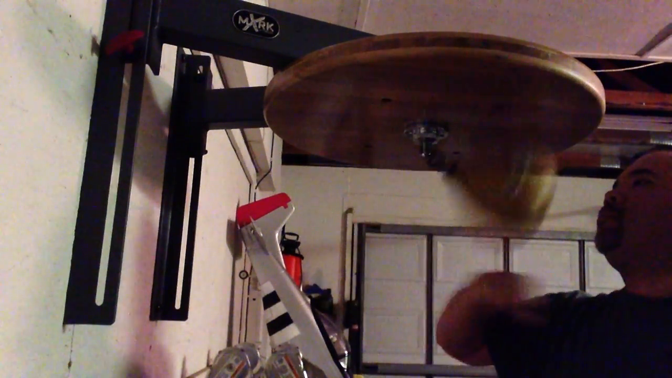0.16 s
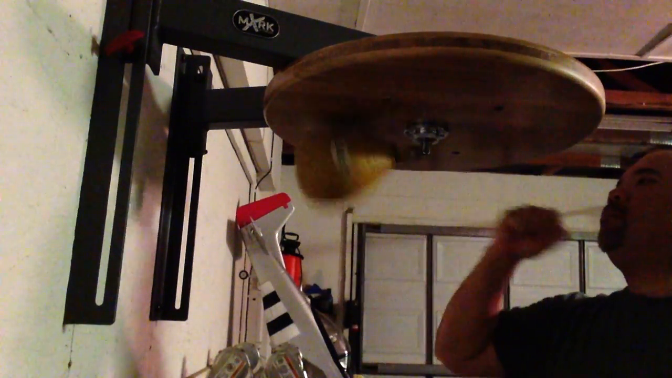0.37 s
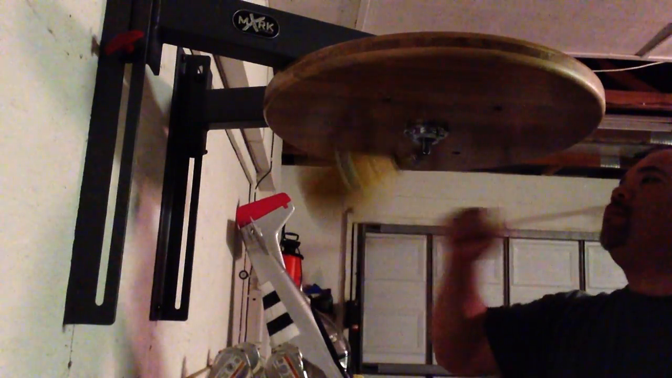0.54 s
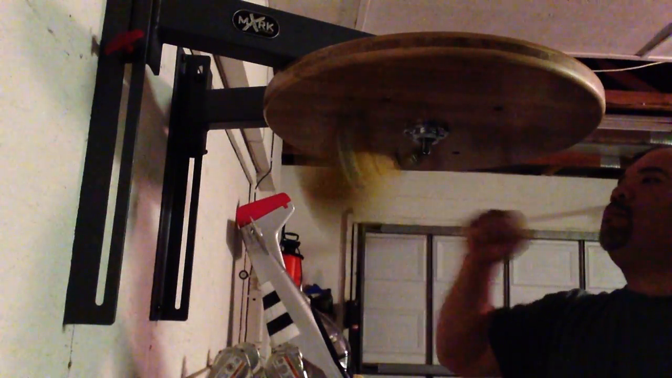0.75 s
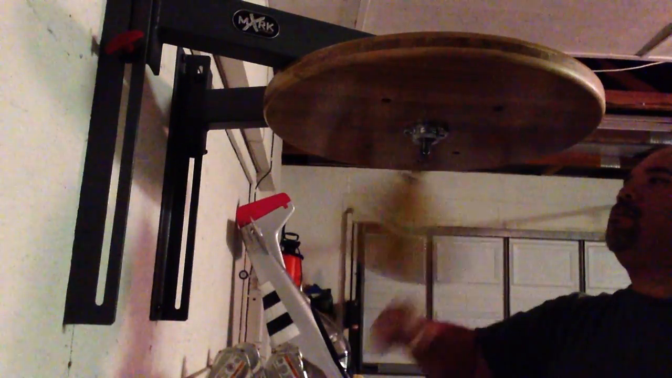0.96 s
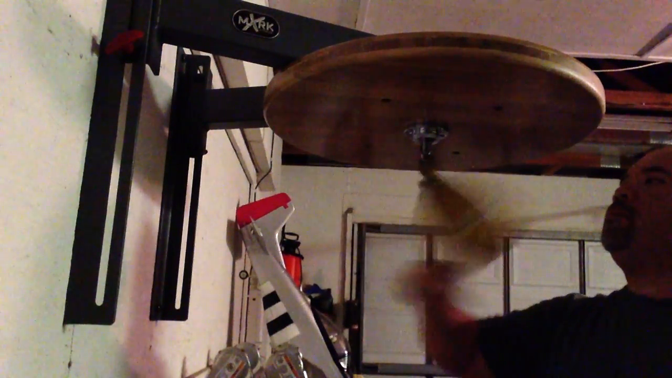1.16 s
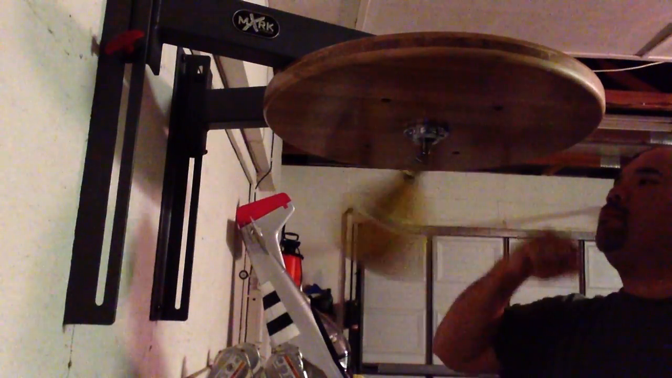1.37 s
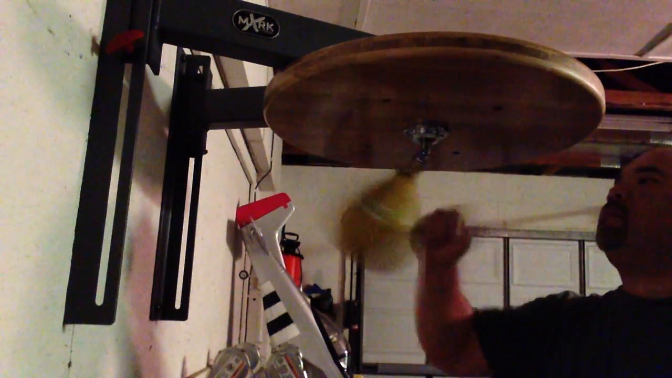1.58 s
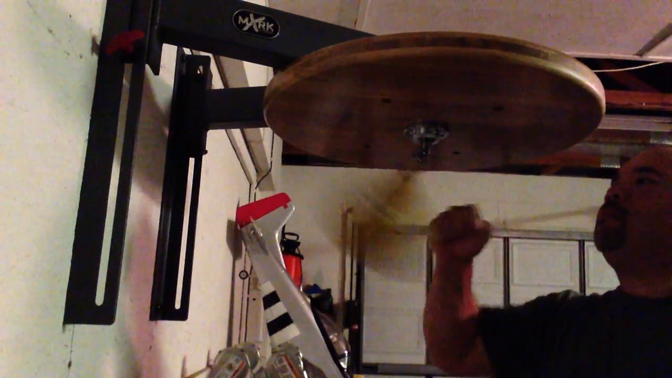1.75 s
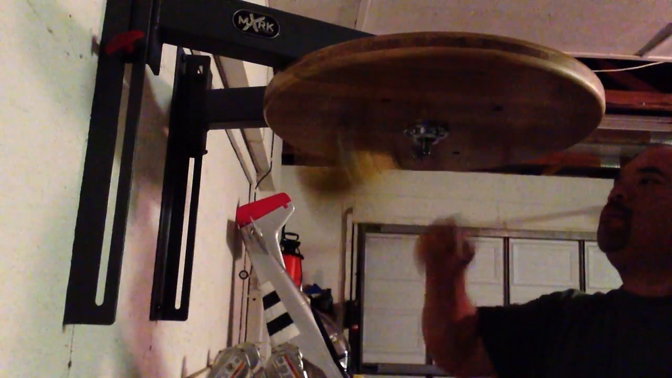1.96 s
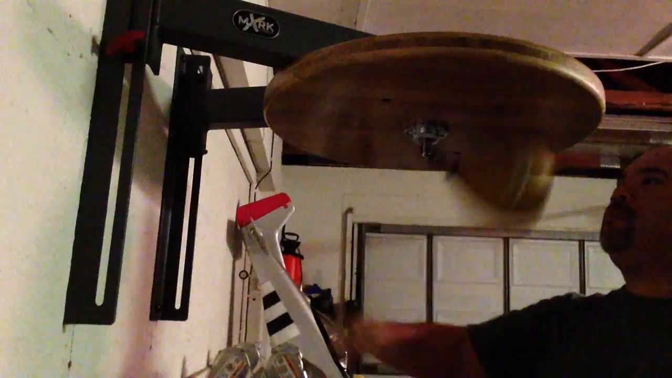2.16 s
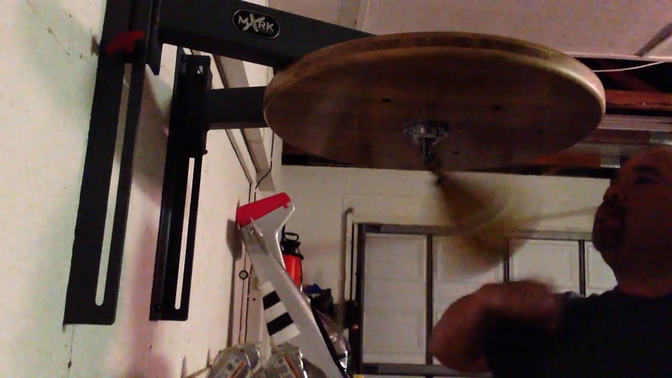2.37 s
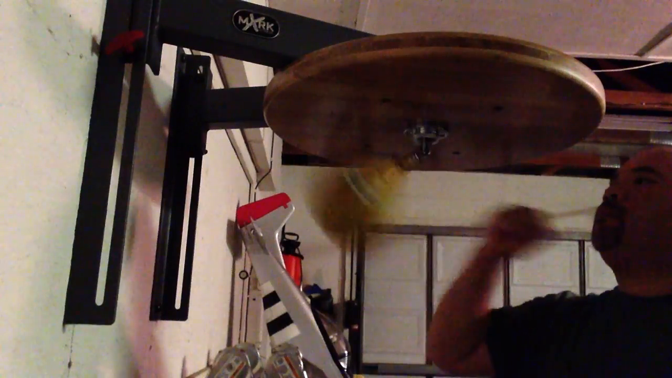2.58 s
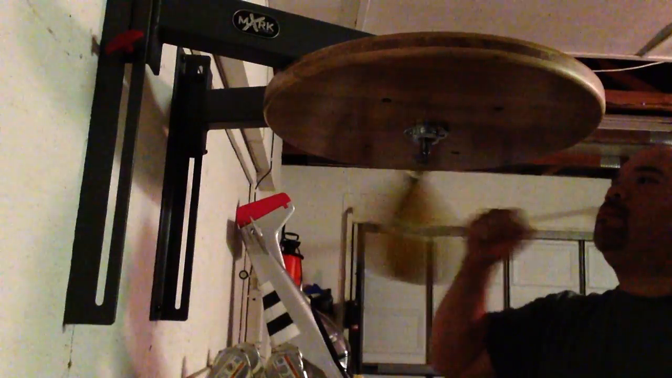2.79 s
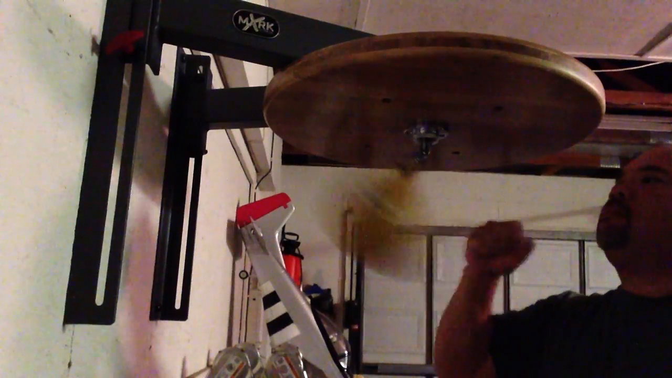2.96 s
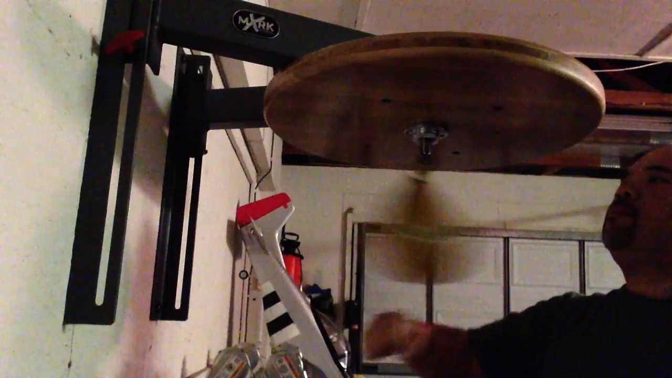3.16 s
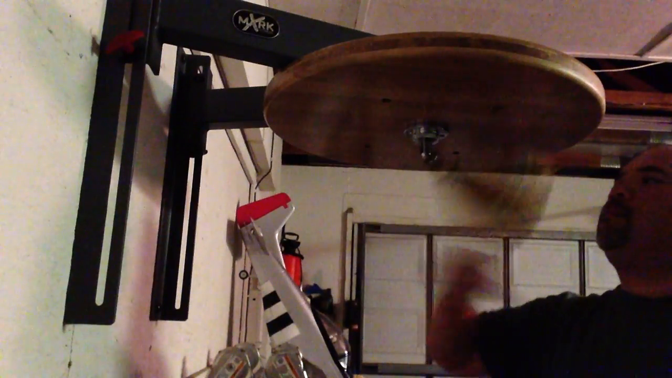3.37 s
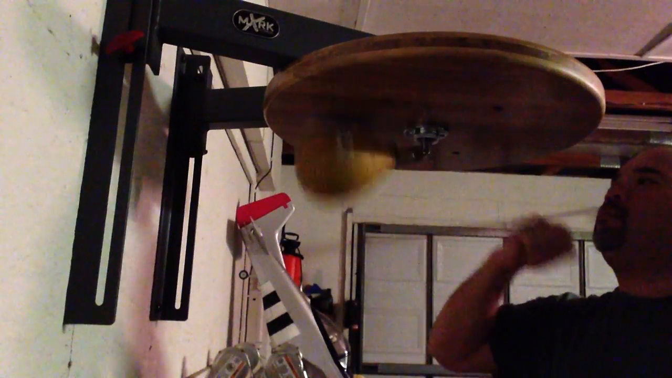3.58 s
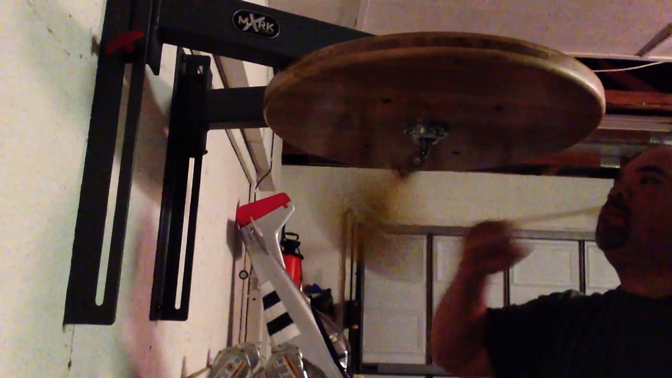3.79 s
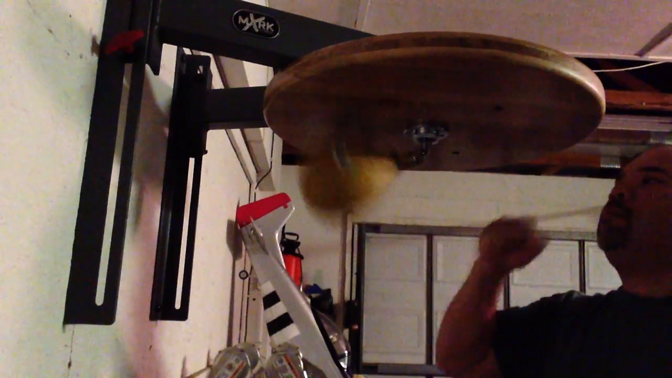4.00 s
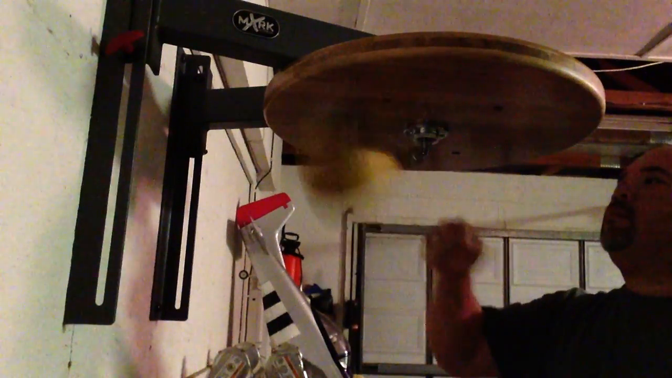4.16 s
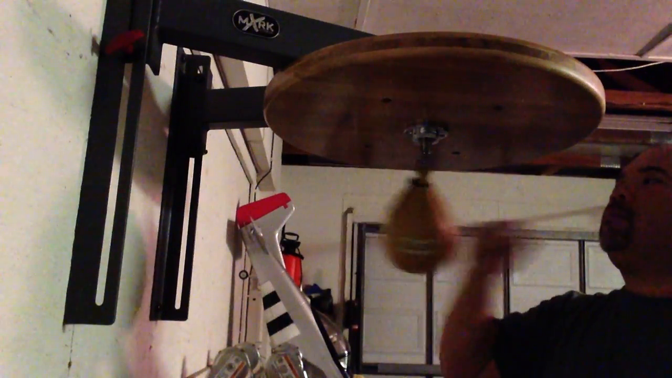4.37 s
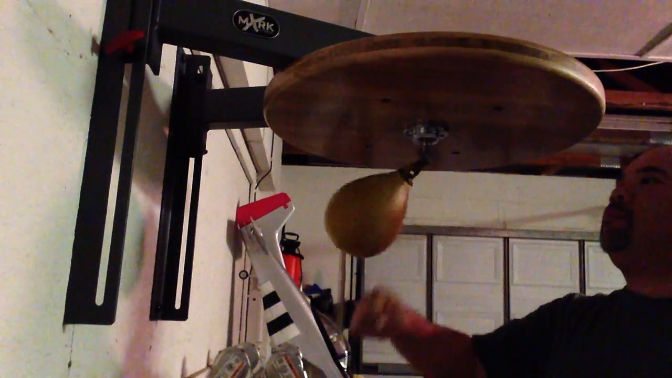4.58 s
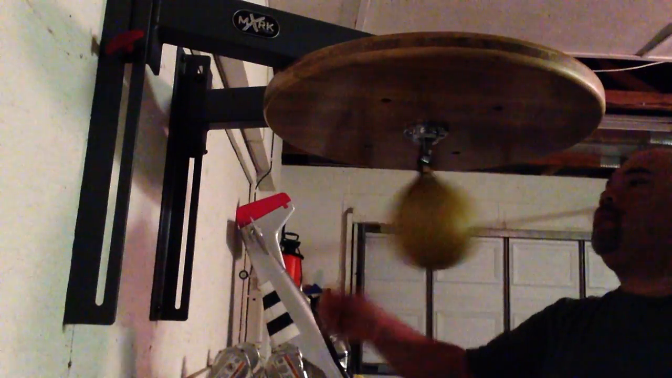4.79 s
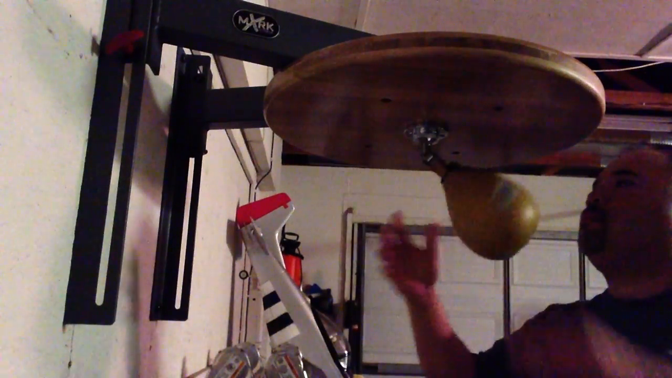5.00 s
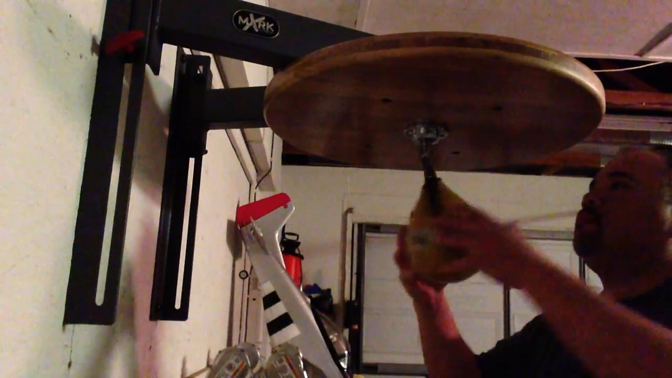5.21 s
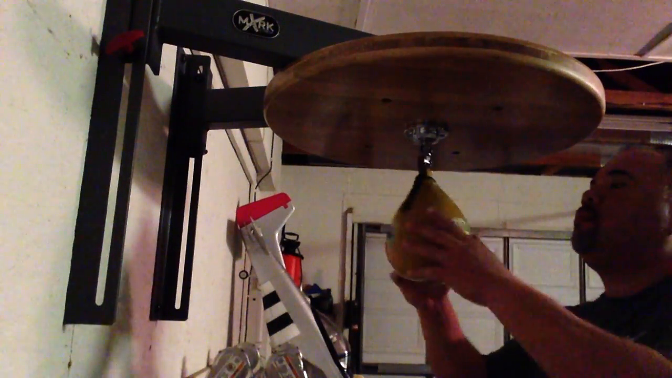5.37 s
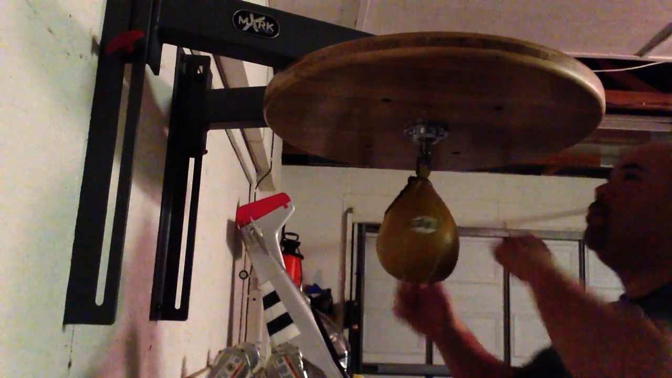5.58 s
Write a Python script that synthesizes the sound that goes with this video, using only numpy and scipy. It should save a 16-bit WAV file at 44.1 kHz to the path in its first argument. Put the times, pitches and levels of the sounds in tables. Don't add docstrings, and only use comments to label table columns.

```python
import sys
import numpy as np
from scipy import signal
from scipy.fft import rfft, irfft
from scipy.io import wavfile
from scipy.ndimage import uniform_filter1d

SR = 44100
rng = np.random.default_rng(int(sys.argv[2]) if len(sys.argv) > 2 else 0)


def linear_from_db(decibels):
    return 10 ** (np.asarray(decibels, float) / 20)


def generate_wav(sig):
    pcm = np.round(np.clip(np.atleast_2d(sig).T, -1, 1) * 32767).astype(np.int16)
    wavfile.write(sys.argv[1], SR, pcm)


N = 248724

# frequency in Hz, density in dB per Hz.
FLOOR_COLOUR = [(30, -34), (55, -19), (75, -9), (110, -13.5), (250, -8.5), (450, -10.5), (1000, -15.5),
                (2000, -24.5), (4500, -23), (8000, -29), (15000, -23.5)]
# frequency in Hz, level in dB.
APPLIANCE_TONES = [(72, -80), (87, -79)]
# frequency in Hz, t60 in seconds.
GARAGE_DECAY = [(100, 1), (500, 0.49), (1500, 0.49), (3000, 0.44), (6000, 0.31), (10000, 0.27),
                (15000, 0.058)]
# frequency in Hz, level in dB.
TAIL_COLOUR = [(150, -8), (400, -0.5), (1500, -3), (3000, -5.5), (6000, -6), (10000, -3), (15000, -4)]
# delay in seconds, level in dB.
ECHOES = [(.0035, -38), (.0075, -24.5), (0.015, -19.5), (.046, -16)]
# frequency in Hz, level in dB.
ECHO_COLOUR = [(300, -8), (1800, 0), (5000, -8), (9000, -22), (15000, -30)]
# time in seconds, level in dB.
RUB_LEVEL = [
    (5.148, -86),
    (5.3, -71),
    (5.339, -62.5),
    (5.38, -75),
    (5.41, -65),
    (5.458, -70.5),
    (5.49, -71),
    (5.64, -76),
]
# frequency in Hz, level in dB.
STEEL_COLOUR = [(2500, -22), (4000, -12.5), (5100, -5), (6300, -7.5), (8500, -11), (10500, -8.5),
                (12000, -6), (13300, -7.5), (14900, 0), (15500, -6), (16200, -31.5)]
# start in seconds, level in dB, lower treble in dB.
RATTLES = [(.1262, -25, -4.5), (.2, -7, -5.5), (.3077, -30, 3), (.5392, -26, -28), (.588, -19.5, 0),
           (.614, -26, -18.5), (1.2437, -19.5, -0.5), (1.3059, -10.5, -14), (1.3843, -18, -11.5),
           (1.6926, -23, -11.5), (1.8267, -20, -7), (1.9954, -20, 6.5), (2.3404, -9.5, -9),
           (2.356, -26, -1), (2.389, -7.5, -10.5), (2.4174, -15, -21), (2.4695, -14, -15.5),
           (2.7567, -24, -13), (2.908, -13, -9.5), (3.4795, -11.5, 4.5), (3.9115, -25, 1),
           (3.932, -20.5, -9.5), (4.204, -19, -3), (4.3874, -25.5, 2), (4.4014, -15.5, -25),
           (4.457, -15, -4.5), (4.5236, -26.5, -16), (4.859, -35, 0), (5.0375, -27, -10.5),
           (5.1751, -48, -30)]
# frequency in Hz, level in dB.
LEATHER_COLOUR = [(60, -48.5), (150, -27), (500, -22.5), (1000, -10), (1700, -6.5), (2600, -9), (4000, -14),
                  (6500, -17.5), (9000, -25.5), (15200, -38.5), (16000, -54)]
# frequency in Hz, level in dB, t60 in seconds.
BRACKET_MODES = [(443, 0, .3), (457, -6, .2), (330, -4, .2), (240, -5, .2), (105, -5, .2), (872, -9, .2),
                 (990, -8, .25)]
# start in seconds, level in dB, hollow note in Hz,
# bracket hum in dB, brightness in dB.
PUNCHES = [(.154, -9.5, 2420, -31.5, 8), (0.1724, -12.5, 1570, -34.5, 0), (0.1872, -12, 2230, -42, 2),
           (.255, -23, 1770, -44, 4.5), (1.2472, -9, 1420, -35, 4), (1.292, -29, 1670, -29, -7.5),
           (1.3062, -9, 1620, -55, 3.5), (1.996, -27.5, 2280, -61.5, -4), (2.035, -26, 2220, -39.5, -2.5),
           (2.3427, -10, 1780, -33.5, 6.5), (2.3609, -20.5, 1770, -42, -2), (2.376, -21.5, 1772, -38, -5),
           (2.3986, -7, 2498, -29.5, -3), (3.458, -17.5, 1680, -41, 5.5), (3.494, -23.5, 2260, -70.5, -3),
           (3.801, -21.5, 1740, -52, 6), (4.4059, -16.5, 1640, -40, 9), (4.459, -29.5, 1600, -42, -15),
           (4.698, -54.5, 2200, -66, -5), (4.859, -40.5, 2020, -57, -22)]
# start in seconds, level in dB, bracket hum in dB.
TAPS = [(0.421, -46, -39), (0.509, -30, -55), (0.6242, -31.5, -44.5), (0.6845, -24, -33.5),
        (0.7872, -24.5, -47), (.9455, -25.5, -56), (1.1, -26, -55.5), (1.117, -28.5, -46.5),
        (1.7056, -24, -47), (1.869, -29, -60), (2.076, -25.5, -62), (2.1787, -27.5, -60.5),
        (2.202, -28.5, -49.5), (2.267, -28, -42.5), (2.585, -35, -44.5), (2.6484, -32, -40.5),
        (2.767, -27.5, -49.5), (2.906, -25, -36.5), (2.949, -25, -59), (3.1317, -28.5, -55.5),
        (3.2988, -23, -57), (3.3137, -26, -39.5), (3.3882, -23.5, -71.5), (3.6347, -30.5, -40.5),
        (4.091, -30.5, -58), (4.204, -33.5, -34.5), (4.221, -30.5, -31.5)]
# start in seconds, level in dB, bracket hum in dB.
CATCHES = [(5.088, -49, -78), (5.144, -78, -55.5), (5.259, -61, -70), (5.339, -63, -58.5),
           (5.5125, -62, -56.5)]
# frequency in Hz, level in dB.
CRACK_COLOUR = [(150, -44), (400, -18), (900, -7.5), (2000, -1.5), (4000, 0), (7000, -0.5), (10000, -8.5),
                (13500, -3.5), (15200, -9), (16000, -34)]
# frequency in Hz, level in dB, t60 in seconds.
BOARD_MODES = [(90, -18, 0.14), (117.5, -17, 0.42), (280, -9, 0.037), (326.4, -20.5, 0.079),
               (449, -12, 0.13), (514, -21.5, 0.16), (660, -20.5, 0.077), (863, -18.5, 0.2),
               (1011, -25.5, 1), (1228, -26.5, 0.98), (1670, -26, 1), (1740, -23.5, .3)]
# frequency in Hz, level in dB, t60 in seconds.
ROOM_MODES = [(192, -12, .3), (209, -6.5, .4)]
# start in seconds, crack in dB, boom in dB,
# swivel lag in ms, swivel in dB.
FAR_SLAMS = [(0.1435, -15.5, -29, 15, -35), (0.4475, -15, -28.5, 20.5, -15), (0.6439, -10, -26.5, 13, -26),
             (0.8067, -5, -23, 17.2, -18), (0.9717, -4.5, -25.5, 15.5, -19.5),
             (1.5465, -15, -33.5, 13, -28), (1.7215, -4.5, -23.5, 13, -33.5),
             (1.885, -5.5, -23.5, 10.4, -19.5), (2.051, -5, -24, 18, -11.5),
             (2.6061, -18.5, -30.5, 15, -40), (2.7887, -4.5, -23, 14, -28),
             (2.9751, -5.5, -24.5, 18.2, -16.5), (3.1562, -5, -25, 16, -21.5),
             (3.6626, -7.5, -27, 15.3, -18.5), (3.825, -4.5, -25.5, 13.7, -19.5),
             (4.0453, -15, -35, 11.2, -36), (4.26, -8, -24.5, 16.6, -13)]
# start in seconds, crack in dB, boom in dB, swivel lag in ms, swivel in dB.
NEAR_SLAMS = [(0.0251, -9, -31, 28, -17.5), (0.2184, -6.5, -26, 19.8, -14.5),
              (1.1432, -7, -30.5, 16, -33.5), (2.2272, -10, -31.5, 18, -24.5),
              (3.3456, -9, -29.5, 13.9, -17.5), (3.4776, -5.5, -22.5, 18, -9.5)]
# start in seconds, crack in dB, boom in dB, brightness in dB.
GLANCES = [(0.562, -27, -21.5, -9), (0.7396, -26, -25, -6), (0.9024, -25.5, -24.5, -4),
           (1.2327, -27.5, -30.5, 11), (1.3274, -11, -33, 2), (1.6591, -15.5, -32, -6),
           (1.8276, -13.5, -38, -2), (1.98, -28, -32, -2), (2.3302, -11.5, -26.5, 0.5),
           (2.7184, -27.5, -32, -4), (2.8882, -18.5, -29, 2), (3.0758, -23.5, -28.5, 4.5),
           (3.427, -22.5, -27.5, -2), (3.7634, -28, -21.5, 1), (3.9321, -34.5, -40, -13.5),
           (4.1811, -21, -36, -10), (5.1762, -47, -56, -12), (5.3023, -45, -57, -16)]


def evened(x):
    return x / np.sqrt(np.mean(x ** 2) + 1e-20)


def read(points, hz):
    f, value = np.transpose(points)
    return np.interp(np.log(hz + 1), np.log(f + 1), value)


def add(mix, s, sound):
    part = mix[round(s * SR):][:len(sound)]
    part += sound[:len(part)]


def causal(points, size=1024):
    log_gain = np.log(linear_from_db(read(points, abs(np.fft.fftfreq(size, 1 / SR)))))
    pulse = np.fft.ifft(np.exp(np.conj(signal.hilbert(log_gain)))).real[:size // 2]
    return pulse / np.linalg.norm(pulse)


def coloured(x, points):
    return irfft(rfft(x) * linear_from_db(read(points, np.fft.rfftfreq(len(x), 1 / SR))), len(x))


def ring(modes, seconds, scatter, spread_db):
    t = np.arange(round(seconds * SR)) / SR
    hz, db, t60 = np.transpose(modes)[:, :, None]
    envelope = linear_from_db(db + spread_db * scatter[:, None] - 60 * t / t60)
    return (envelope * np.sin(2 * np.pi * hz * t)).sum(0)


def quiet_floor():
    return linear_from_db(-70.5) * evened(coloured(rng.standard_normal(N), FLOOR_COLOUR))


def appliance():
    t = np.arange(N) / SR
    return sum(linear_from_db(db) * np.sin(2 * np.pi * hz * t) for hz, db in APPLIANCE_TONES)


def earlier_blows():
    colour = [(80, -9), (180, 16.5), (600, 2), (2000, 11), (6000, -14.5), (15000, -22.0)]
    level_db = -44.5 - 60 * np.arange(N) / SR
    return linear_from_db(level_db) * evened(coloured(rng.standard_normal(N), colour))


def garage(x):
    out, size, spacing = np.zeros(N), 30000, 14
    dulled = coloured(x, ECHO_COLOUR)
    for s, db in ECHOES:
        add(out, s, linear_from_db(db) * dulled)
    for k in range(3):
        taps = np.zeros(size)
        at = np.arange(100, size - spacing, spacing)
        at = at + rng.integers(0, spacing, len(at))
        taps[at] = rng.choice([-1., 1.], len(at))
        hz, t, z = signal.stft(taps, SR, nperseg=256)
        decay = linear_from_db(-60 * t / read(GARAGE_DECAY, hz)[:, None])
        decay *= linear_from_db(read(TAIL_COLOUR, hz)[:, None]) / np.linalg.norm(decay, axis=1)[:, None]
        tail = signal.istft(z * decay, SR, nperseg=256)[1] * np.sqrt(spacing / 128)
        turn = np.sqrt(2 / 3) * np.cos(2 * np.pi * (np.arange(N) / SR / .29 + k / 3))
        out += signal.fftconvolve(x * turn, tail)[:N]
    return out


def squeak():
    start_s, end_s = 5, 4.5
    hz, width_hz, level_db = 4500, 500, -73
    band = [(hz - width_hz, -30), (hz - width_hz / 2, 0), (hz + width_hz / 2, 0), (hz + width_hz, -30)]
    hiss = evened(coloured(rng.standard_normal(N), band))
    swing = np.clip((np.arange(N) / SR - start_s) / (end_s - start_s), 0, 1)
    return linear_from_db(level_db) * hiss * np.sqrt(np.sin(np.pi * swing).clip(0))


def hands():
    s, db = np.transpose(RUB_LEVEL)
    grains = rng.standard_normal(N) * linear_from_db(3.2 * uniform_filter1d(rng.standard_normal(N), 60) * 8)
    rub = evened(coloured(grains, [(300, -24), (1000, -5.5), (8000, -7.5), (14000, -7.5)]))
    level_db = np.interp(np.arange(N) / SR, s, db, left=-120)
    return linear_from_db(level_db + 2.0) * rub


def clinks():
    snaps = [(s + lag_ms / 1000, db, -8) for s, _, _, lag_ms, db in FAR_SLAMS + NEAR_SLAMS]
    return RATTLES + snaps


def swivel():
    out, t = np.zeros(N), np.arange(500) / SR
    chatter_shape = t / 0.00095 * np.exp(1 - t / 0.00058) + 0.14 * np.exp(-t / 0.011)
    for s, db, low_db in clinks():
        colour = causal([(hz, level + (low_db + 3) * (hz < 9000)) for hz, level in STEEL_COLOUR])
        chatter = rng.standard_normal(500) * chatter_shape
        add(out, s + 0.00022, linear_from_db(db - 4.0) * np.convolve(chatter, colour))
    return out


def slaps():
    tap_hz, tap_s, punch_s = 1540, 0.0096, 0.012
    full = [(s, db, hz, punch_s, bright, hum) for s, db, hz, hum, bright in PUNCHES]
    light = [(s, db, tap_hz, tap_s, max(14 + 0.9 * db, -17.5), hum) for s, db, hum in TAPS]
    caught = [(s, db, tap_hz, tap_s, -7, hum) for s, db, hum in CATCHES]
    return full + light + caught


def fists():
    spread, close = np.zeros((2, N))
    t = np.arange(3000) / SR
    for s, db, hz, length, bright_db, bracket_db in slaps():
        noise, grain = rng.standard_normal((2, 3000))
        pressure = (1 - np.exp(-t / .002)) * np.exp(-(t / np.clip(length, .007, .04)) ** 2)
        drive = pressure * noise * linear_from_db(15 * uniform_filter1d(grain, 20))
        colour = [(f, level + bright_db * max(np.log2(f / 2500), 0) / 2) for f, level in LEATHER_COLOUR]
        hollow = [(f, read(colour, f) + 7 * np.exp(-(np.log(f / hz) / 0.11) ** 2))
                  for f in np.geomspace(50, 17000, 80)]
        plain = np.convolve(drive, causal(colour))
        noted = np.convolve(drive, causal(hollow))
        gain = linear_from_db(db + 1.5) / abs(noted).max()
        add(spread, s - .002, gain * plain)
        add(close, s - .002, gain * (noted - plain))
        hum = ring(BRACKET_MODES, .6, noise[:len(BRACKET_MODES)], 2)
        onset = 1 - np.exp(-np.arange(len(hum)) / SR / .008)
        add(spread, s, linear_from_db(bracket_db - 7) * hum * onset)
    return spread, close


def landings():
    blows = []
    for gap_ms, rows in ((.52, FAR_SLAMS), (.95, NEAR_SLAMS)):
        for s, crack, boom, _, _ in rows:
            bright = -2.5 + 0.42 * (crack + 4)
            if s < .7:
                bright -= 3.5
            blows.append((s, gap_ms, 0.89, crack, boom, bright))
    blows += [(s, .8, .55, crack, boom, bright) for s, crack, boom, bright in GLANCES]
    return [(s, gap_ms, share, 0.29 * np.exp((boom - crack) / 14), crack, boom, bright)
            for s, gap_ms, share, crack, boom, bright in blows]


def squeezed_air(t):
    start_hz, end_hz, sag_s = 420, 151, .002
    hz = end_hz + (start_hz - end_hz) * np.exp(-t / sag_s)
    return np.sin(2 * np.pi * np.cumsum(hz) / SR)


def board():
    spread, repeat = np.zeros((2, N))
    t, long_t = np.arange(400) / SR, np.arange(round(.7 * SR)) / SR
    thump = squeezed_air(long_t)
    for s, gap_ms, share, crush, crack_db, boom_db, bright_db in landings():
        luck = rng.standard_normal(len(BOARD_MODES) + 400)
        colour = [(hz, db + bright_db * np.log2(hz / 3000) / 2) for hz, db in CRACK_COLOUR]
        pulse = -linear_from_db(crack_db + 5.5) * causal(colour)
        contact = 0.77 * crush * luck[len(BOARD_MODES):] * np.exp(-t / 0.0049)
        contact[0] += 1
        add(spread, s, np.convolve(contact, pulse))
        add(repeat, s + gap_ms / 1000, share * pulse)
        thump_t60 = .17 * np.exp(-4.5 * crush)
        rings = ring(BOARD_MODES, .7, luck[:len(BOARD_MODES)], 2.6)
        rings += ring(ROOM_MODES, .7, luck[-2:], 1.5) * (1 - np.exp(-(long_t / .03) ** 2))
        boom = thump * linear_from_db(-60 * long_t / thump_t60) + linear_from_db(-20 * crush) * rings
        add(spread, s, linear_from_db(boom_db - 3.0) * boom * (1 - np.exp(-long_t / 0.00092)))
    return spread, repeat


def scene():
    hollow_wet = .2
    knocks, repeats = board()
    smacks, hollow = fists()
    dry = knocks + smacks + hollow_wet * hollow + swivel() + hands()
    close = repeats + (1 - hollow_wet) * hollow
    background = quiet_floor() + appliance() + earlier_blows() + squeak()
    return (dry + close + garage(dry) + background)[None]


def low_pass(x):
    return signal.sosfilt(signal.butter(12, 16570, fs=SR, output="sos"), x)


def record(dry):
    thin = signal.sosfilt(signal.butter(1, 90, "high", fs=SR, output="sos"), dry)
    edge = signal.firwin(201, 15300, window=("kaiser", 2.2), fs=SR)
    return low_pass(signal.oaconvolve(thin, edge[None], "same"))


dry = scene()
out = record(dry)
generate_wav(out)
```